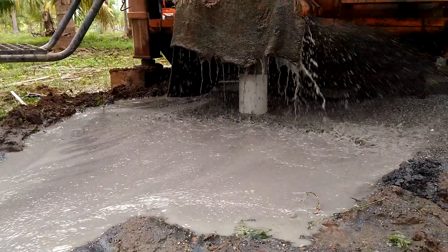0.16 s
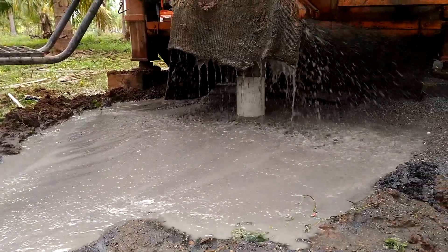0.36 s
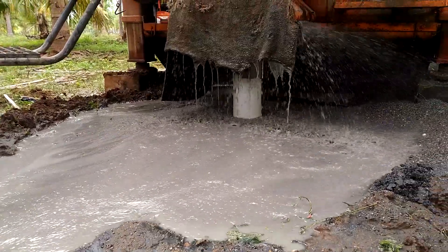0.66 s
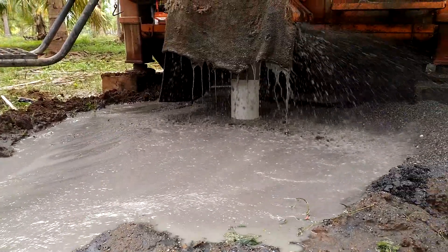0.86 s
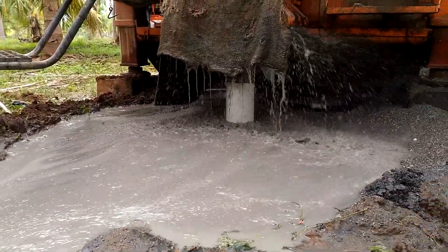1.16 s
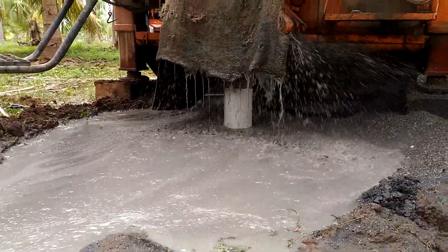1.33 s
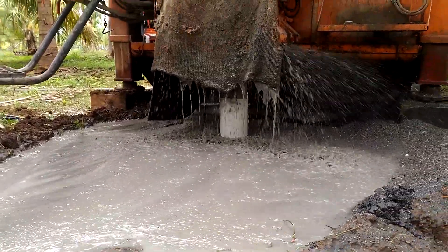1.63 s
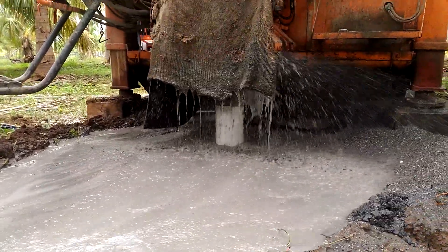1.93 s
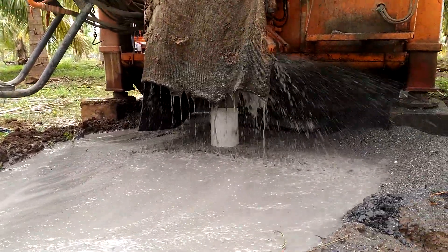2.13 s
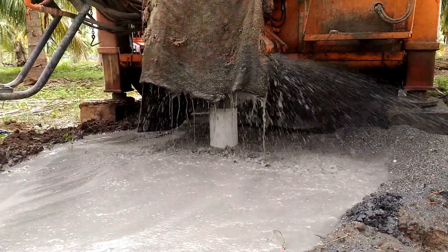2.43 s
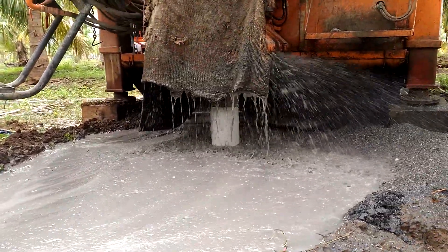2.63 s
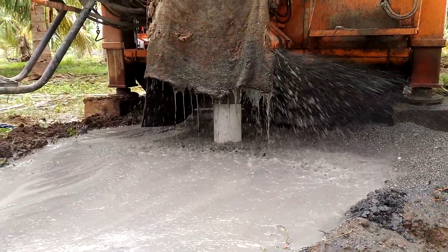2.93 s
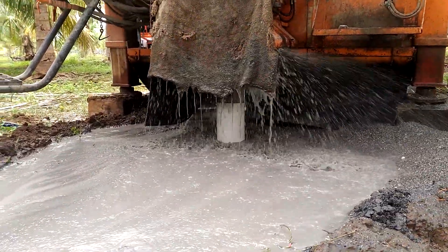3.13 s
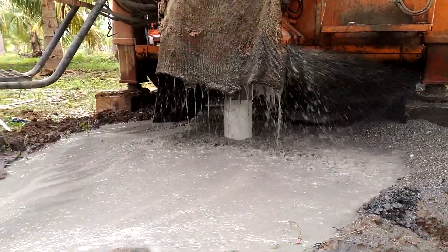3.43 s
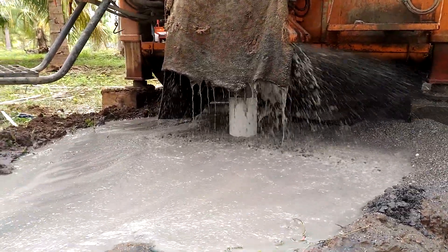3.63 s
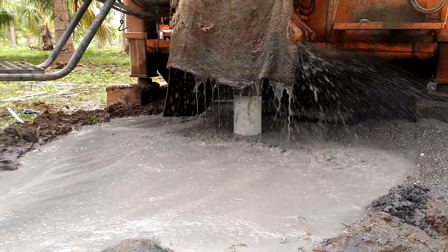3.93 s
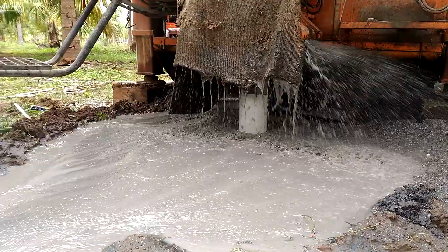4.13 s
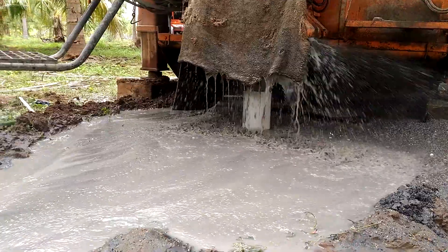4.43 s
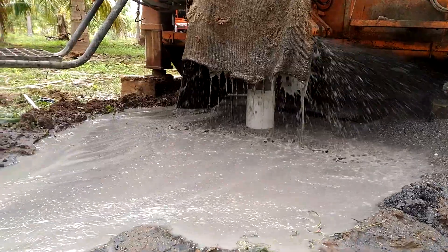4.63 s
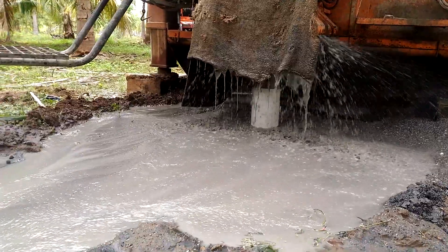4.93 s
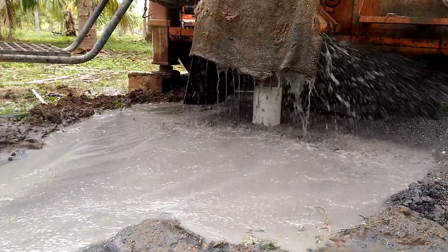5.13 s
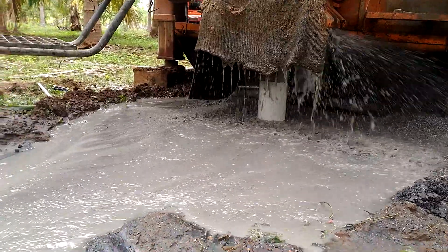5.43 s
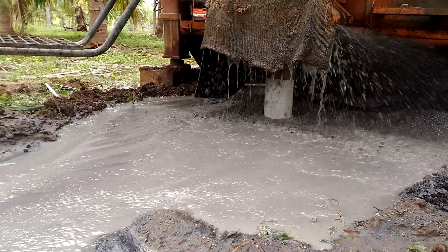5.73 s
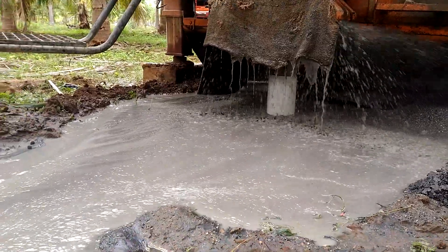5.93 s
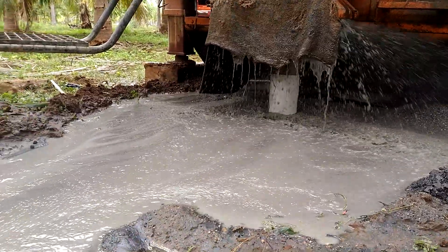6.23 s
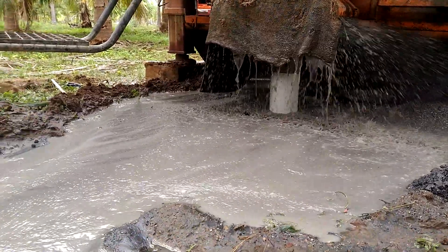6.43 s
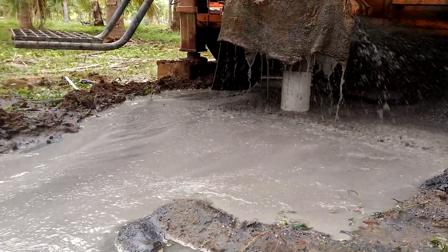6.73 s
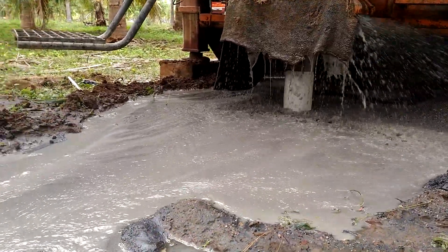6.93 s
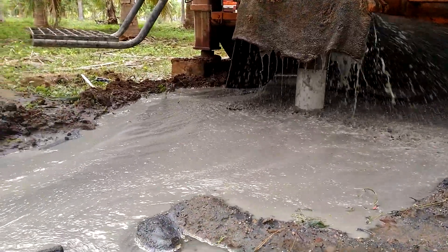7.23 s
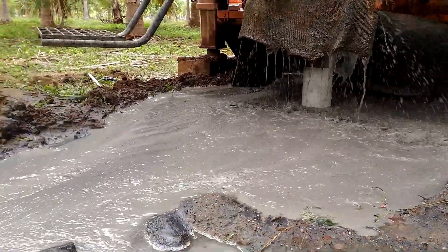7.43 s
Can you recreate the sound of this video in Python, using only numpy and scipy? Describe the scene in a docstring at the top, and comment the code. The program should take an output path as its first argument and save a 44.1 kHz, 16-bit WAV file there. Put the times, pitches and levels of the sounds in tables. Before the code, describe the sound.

A borewell drilling rig hammers at a rapid metallic rattle, steel rods scraping and squealing, over hissing water spray and a droning diesel engine outdoors.

```python
"""Outdoors at a borewell, beside a pool of slurry, a drilling rig works a few metres away.
An air hammer pounds deep in the hole: timed impulses climb the rods through narrow pass bands.
The turning rod scrapes the steel around it, heard as narrow modes driven by noise that throbs with the blows.
Air, water and grit spray from the well head as coloured noise that surges and puffs.
A six-cylinder diesel drones: sine orders of its firing rate over a broad noise roar."""
import sys
import numpy as np
from scipy import signal
from scipy.fft import rfft, irfft
from scipy.io import wavfile
from scipy.ndimage import uniform_filter1d

SR = 44100
rng = np.random.default_rng(int(sys.argv[2]) if len(sys.argv) > 2 else 0)


def to_wav(sig):
    """Store sig (one row per channel, or 1-D mono) as 16-bit WAV at the path in sys.argv[1].

    Samples outside -1..1 are clipped; the rate is SR.
    """
    pcm = np.clip(np.atleast_2d(sig), -1, 1) * 32767
    pcm = np.round(pcm).astype(np.int16)
    wavfile.write(sys.argv[1], SR, pcm.T)  # frames by channels


N = 333396
TIME = np.arange(N) / SR
HZ = np.fft.rfftfreq(N, 1 / SR)


def gain_of(db):
    """Logarithmic level: decibels to amplitude."""
    return 10 ** (np.asarray(db) / 20)


def evened(x):
    """Power normalisation: scales to rms 1."""
    return x / np.sqrt(np.mean(x ** 2) + 1e-20)


def curves(rows):
    """Linear interpolation: each column of a time table, sample by sample."""
    start_s, *columns = np.transpose(rows)
    return [np.interp(TIME, start_s, column) for column in columns]


def read(points, hz):
    """Logarithmic frequency axis: reads a table between its points."""
    point_hz, value = np.transpose(points)
    return np.interp(np.log(hz + 1), np.log(point_hz + 1), value)


def shaped(x, response):
    """Linear filtering: multiplies the spectrum by a frequency response."""
    return irfft(rfft(x) * response, N)


def wander(per_s):
    """Band-limited randomness: smooth chance of about rms 1, its peaks held below 2."""
    fine = signal.resample(rng.standard_normal(400), 400 * 20)
    drift = np.interp(TIME * per_s * 20, np.arange(len(fine)), fine)
    return 2 * np.tanh(drift * 0.55)


def pair(x, likeness):
    """Interaural correlation: two unrelated signals become a left and right of given likeness."""
    side = x[1] * np.sqrt((1 - likeness) / (1 + likeness))
    return np.array([x[0] + side, x[0] - side])


def placed(x, side_db):
    """Level-difference panning: leans a sound left (positive) or right (negative)."""
    return x * gain_of([[side_db / 2], [-side_db / 2]])


def steadied(x, size):
    """Automatic gain: holds the slow level of a stereo sound at 1, leaving its fast flutter."""
    power = uniform_filter1d((x ** 2).mean(0), size)
    power = uniform_filter1d(power, size // 2)
    x = x / np.sqrt(np.abs(power) + 1e-20)
    return x / x.mean(0).std()


def band(x, hz, width_hz, order):
    """Butterworth resonance: a pass band, steeper with each order."""
    edges = [hz - width_hz / 2, hz + width_hz / 2]
    return signal.sosfilt(signal.butter(order, edges, "bandpass", fs=SR, output="sos"), x)


# likeness of the left and right microphones: pitch_hz, likeness (0-1)
MICROPHONE_LIKENESS = [(60, 0.84), (600, 0.95), (1300, 0.57), (3000, 0.098), (5000, 0), (14000, 0)]


def coloured(x, spectrum):
    """Spatial coherence: gives two noises a spectrum and a likeness that depends on pitch."""
    likeness = read(MICROPHONE_LIKENESS, HZ)
    mid, side = rfft(x) * gain_of(read(spectrum, HZ)) * np.sqrt([1 + likeness, 1 - likeness])
    return irfft(np.array([mid + side, mid - side]), N) / irfft(mid, N).std()


# rate of the down-hole hammer: start_s, blows_per_s
HAMMER_RATE = [(0.0, 28.05), (0.7, 27.72), (1.1, 27.24), (1.6, 28.08), (2.0, 27.55), (2.35, 28.17),
               (2.9, 27.72), (3.3, 26.77), (3.55, 27.17), (3.85, 28.19), (4.25, 27.61), (4.6, 26.0),
               (4.95, 27.86), (5.3, 26.82), (5.7, 27.89), (6.3, 27.33), (6.8, 27.68), (7.56, 27.78)]


def hammer_turns():
    """Phase accumulation: the count of hammer cycles is the running integral of the blow rate."""
    return np.cumsum(curves(HAMMER_RATE)[0]) / SR


BLOW_SPREAD_DB, BLOW_JITTER_S = 2, .00008  # the piston keeps close time


def blows(turns, arrival_s, length_s):
    """Impulse excitation: one swell a blow, each of its own strength, and the sharp kick that starts it."""
    at = np.flatnonzero(np.diff(np.floor(turns), prepend=-1))
    size_db, late_s = (rng.standard_normal((len(at), 2)) * [BLOW_SPREAD_DB, BLOW_JITTER_S]).T
    landing = at + ((arrival_s + late_s) * SR).astype(int)
    kicks = np.zeros(N)
    kicks[np.clip(landing, 0, N - 1)] = gain_of(size_db)
    # a double pole makes each swell rise and die smoothly
    decay = np.exp(-1 / (length_s * SR))
    swell = signal.lfilter([1], [1, -2 * decay, decay * decay], kicks)
    return evened(swell), kicks


def rod_band(turns, hz, width_hz, db, arrival_s, length_s, regular, lingering):
    """Periodic waveguide: a blow climbs one pass band as a kick and a noise burst over lingering echoes."""
    swell, kicks = blows(turns, arrival_s, length_s)
    noise = pair(rng.standard_normal((2, N)), read(MICROPHONE_LIKENESS, hz))
    scatter = noise * evened(swell + lingering)
    kicks = np.roll(evened(kicks), round(length_s * SR))  # onto the peak of the swell
    drive = np.sqrt(regular) * kicks + np.sqrt(1 - regular) * scatter
    return gain_of(db) * steadied(band(drive, hz, width_hz, order=3), size=3300)


# pass bands of the rod string, one dull and several sharp:
# pitch_hz, width_hz, relative level_db, arrival_s after the blow, burst length_s
KNOCK_BAND = (472, 58, -.3, .008, .005)
CLANK_BANDS = [(660, 200, -9.5, .004, .002), (1040, 170, -5, .009, .002), (1422, 95, -1, .0085, .0018),
               (1525, 80, -7.5, .0095, .002), (1810, 80, -8, .014, .004), (2200, 70, -11, .016, .005)]
# their levels, about the usual level of each: start_s, level_db
KNOCK_LEVEL = [(0, -6), (0.1, 4.5), (0.26, -2.6), (0.9, 2.8), (1.05, 0.5), (1.9, -0.5), (2.55, -3.9),
               (3.2, 0.5), (3.42, -2), (3.87, 3.5), (4.73, -3.5), (4.82, 3), (5.0, -2.5), (5.33, 2),
               (5.6, -0.9), (7.08, 2), (7.25, -1.0), (7.56, -2)]
CLANK_LEVEL = [(0, 3.5), (0.55, -2.5), (0.92, 6), (1.03, -9), (1.15, 1.5), (2.3, -0.4), (3.38, -0.8),
               (3.58, 5.6), (3.8, -1.6), (4.2, 1.2), (4.8, -2.5), (5.3, 2.7), (5.55, -9), (6.02, 5.5),
               (6.35, -2), (6.7, 0.9), (7.15, 1.8), (7.56, -4)]
# shudder of the frame: multiple of the hammer rate, level_db
SHUDDER_ORDERS = [(2, -54), (3, -49), (4, -50), (5, -46), (7, -45), (9, -47), (10, -43), (11, -43),
                  (12, -50), (15, -48)]
KNOCK_DB, CLANK_DB = -24, -29.5
BITE_DB, BITE_PER_S = 1.4, 18  # the bit bites unevenly into the rock
KNOCK_REGULAR, CLANK_REGULAR = .5, .2  # power share of the kicks, against noise, in the drive


def hammer(turns):
    """Dispersive arrival: knock and clanks surface at different delays; the frame shudders in step."""
    knock_db = KNOCK_DB + curves(KNOCK_LEVEL)[0] + BITE_DB * wander(BITE_PER_S)
    clank_db = CLANK_DB + curves(CLANK_LEVEL)[0] + BITE_DB * wander(BITE_PER_S)
    knock = rod_band(turns, *KNOCK_BAND, regular=KNOCK_REGULAR, lingering=1.0)
    knock = placed(knock, side_db=0.8) * gain_of(knock_db)
    clank = sum(rod_band(turns, *row, regular=CLANK_REGULAR, lingering=0.82) for row in CLANK_BANDS)
    clank = placed(clank, side_db=-2.0) * gain_of(clank_db)
    shudder = 0
    for k in range(2, 16):
        # the frame smears each blow: its harmonics drift against one another
        phase = 2 * np.pi * (k * turns + rng.random()) + wander(1.97)
        shudder = shudder + gain_of(read(SHUDDER_ORDERS, k)) * np.cos(phase)
    return knock + clank + placed(np.sqrt(2) * shudder, 2.2)


def mode(force, hz, width_hz, side_db, phase, grip, size=16):
    """Modal resonance: a slow complex swing on one steel pitch; friction limits the swing."""
    t, rate = TIME[::size], SR / size
    jolts = force[::size] * (rng.standard_normal((2, len(t), 2)) @ [1, 1j])
    swing = signal.lfilter([1], [1, -np.exp(-np.pi * width_hz / rate)], jolts)
    swing = signal.lfilter(*signal.butter(1, 190, fs=rate), swing)
    swing = pair(swing, .7)  # reflections off the rig make the two sides differ
    height = uniform_filter1d(abs(swing).mean(0), size=60) + 1e-9
    swing = swing / height ** grip
    swing = swing / swing.std() * np.exp([[0], [-1j * phase]])
    carrier = np.exp(2j * np.pi * hz * TIME)
    tone = np.array([np.interp(TIME, t, side) for side in swing]) * carrier
    return placed(tone.real, side_db)


# narrow modes of the rods, the casing and the table, one list a family:
# pitch_hz, width_hz, relative level_db, left minus right side_db, phase_rad between the microphones
STEEL_FAMILIES = [
    [(2428, 26, -1.5, 1.5, -.3), (2470, 70, -7, 2, -.5)],
    [(3568, 44, 0, 4.5, -.6)],
    [(5422, 24, 0, 5.5, 2.1), (5175, 60, -20, 7, 1.6)],
    [(5614, 36, 0, 7.5, 1.6), (5734, 15, -2, 6, 1.7)],
    [(7954, 20, -3.5, -7, .8), (8009, 22, -3, -4, .6)],
    [(9108, 22, -6, -8, 1.6), (9367, 50, -5, -9, 1.9), (9620, 200, -8, -9, 1.9), (10334, 36, -6, -7, 2),
     (11250, 40, -23, -4, 2), (11840, 40, -17, -2, 1), (12784, 30, -16, -3, .8), (13680, 200, -21, -3, 1)],
]
# the rod catches and the family nearest in pitch squeals out:
# time_s of the height, length_s, pitch_hz, rise_db
SQUEAL_EVENTS = [(.18, .14, 3568, 4), (0.503, 0.094, 3568, 4), (0.69, .14, 7954, 6.5), (.81, 0.18, 5422, 4),
                 (1.006, 0.29, 7954, 6), (1.445, .14, 7954, 12), (1.769, 0.24, 2428, 7),
                 (2.157, 0.2, 3568, 9.5), (2.49, .18, 7954, 10), (2.499, 0.084, 5614, 6.5),
                 (3.04, 0.094, 5422, 6.5), (3.149, 0.086, 7954, 11), (3.94, 0.096, 5614, 7),
                 (4.003, 0.55, 3568, 6), (4.106, 0.098, 2428, 7), (4.238, 0.16, 3568, 9.5),
                 (4.264, 0.085, 5422, 3), (4.817, 0.32, 7954, 10), (4.89, 0.15, 3568, 8),
                 (5.29, 0.25, 5422, 7.5), (5.498, 0.26, 5614, 2.5), (5.54, 0.13, 5422, 10),
                 (5.902, .14, 7954, 7.5), (6.01, .12, 5422, 7.5), (6.45, 0.086, 7954, 9),
                 (6.571, 0.11, 5614, 7), (6.758, 0.097, 5422, 8.5), (7.172, 0.13, 5422, 6.5),
                 (7.38, 0.066, 5422, 10.5)]


def squeals():
    """Stick-slip friction: each family's extra level in dB, a smooth arch wherever the rod catches."""
    family_hz = np.array([modes[0][0] for modes in STEEL_FAMILIES])
    rise_db = np.zeros((len(STEEL_FAMILIES), N))
    for height_s, length_s, hz, db in SQUEAL_EVENTS:
        arch = np.maximum(1 - (2 * (TIME - height_s) / length_s) ** 2, 0)
        rise_db[np.argmin(abs(family_hz - hz))] += db * arch
    return rise_db


# how the rod presses on each family:
# follow (dB per dB of blow-out), sway_db, place in the sway (0-1), uneven_db
ROD_PRESSURE = [(0.55, 3, 0.02, 2.6), (-0.15, 2, 0.58, 2.97), (0.38, -0.1, 0.14, 2.5), (.5, 0.3, 0.5, 3.14),
                (1.5, 1.3, 0.6, 2.5), (1.44, 0, 0, 2.6)]
SWAYS_PER_S = 2.96  # the turning rod sways against the steel


def scrapes(flow_db):
    """Contact pressure: each family's level in dB follows blow-out, sway, chance and squeals."""
    pressed_db = []
    for follow, sway_db, place, uneven_db in ROD_PRESSURE:
        sway = np.cos(2 * np.pi * (SWAYS_PER_S * TIME - place))
        pressed_db.append(follow * flow_db + sway_db * sway + uneven_db * wander(20))
    return squeals() + pressed_db


# how each family is driven:
# level_db, throb (share that comes with the blows, 0-1), arrival_s after the blow, grip (0-1)
STEEL_CONTACT = [(-30.5, 0.47, 0.012, 0.02), (-32.5, 0.35, 0.011, 0), (-25.5, 0.6, 0.014, 0.52),
                 (-26, 0.54, 0.011, 0), (-30.5, 0.35, 0.019, 0), (-33, 0.42, .013, 0)]


def steel(turns, flow_db):
    """Modal superposition: blows jerk the rod against families of modes that vie in level."""
    out = np.zeros((2, N))
    for modes, scrape_db, contact in zip(STEEL_FAMILIES, scrapes(flow_db), STEEL_CONTACT):
        db, throb, arrival_s, grip = contact
        swell, _ = blows(turns, arrival_s, length_s=0.0058)
        force = 1 - throb + throb * swell
        ring = 0
        for hz, width_hz, mode_db, side_db, phase in modes:
            rivalry_db = 2.8 * wander(9)
            ring = ring + gain_of(mode_db + rivalry_db) * mode(force, hz, width_hz, side_db, phase, grip)
        out += steadied(ring, size=2600) * gain_of(scrape_db + db)
    return out


# strength of the blow-out from the well head, about its usual level: start_s, level_db
BLOW_OUT = [(0, 2.0), (1.1, 1.0), (1.66, -4), (1.74, 2.4), (2.5, 1.15), (3.2, 1.6), (3.6, -3), (4.37, 2.5),
            (4.62, -6.5), (4.8, 0), (5.28, -0.8), (5.41, -7.5), (5.64, -8), (5.82, 3.1), (6.28, -4),
            (6.7, 1.5), (7.0, -0.6), (7.56, 3.5)]
SURGE_DB, SURGES_PER_S = 1.2, 20  # slugs of water make the blow-out surge


def blow_out():
    """Two-phase flow: the blow-out level in dB, a slow course with random surges."""
    return curves(BLOW_OUT)[0] + SURGE_DB * wander(SURGES_PER_S)


# spectrum of the hiss: pitch_hz, relative level_db
SPRAY_SPECTRUM = [(500, -14.5), (1500, 3), (2100, 8), (2900, 3.5), (3400, 6), (3850, 3), (4150, -5.5),
                  (4800, -6), (5500, 1.5), (6400, 2), (7600, 1.5), (9800, -5), (11200, -9.5),
                  (12500, -15.5)]
# lean of the hiss: pitch_hz, left minus right side_db
SPRAY_LEAN = [(1500, -2.5), (2800, 2), (4500, 1.5), (6400, 8), (7500, -2), (8600, -7), (11000, -2)]
SPRAY_DB = -26.5  # before flow and gusts


def spray(turns, flow_db):
    """Turbulent jet noise: air and fine drops hiss out in gusts, puffing with the hammer."""
    swell, _ = blows(turns, arrival_s=0.012, length_s=0.0022)
    puffs = 1 + 0.13 * swell
    hiss = coloured(rng.standard_normal((2, N)) * puffs, SPRAY_SPECTRUM)
    side_db = read(SPRAY_LEAN, HZ)
    hiss = shaped(hiss, gain_of([side_db / 2, -side_db / 2]))
    gusts_db = .8 * wander(30)
    return hiss * gain_of(SPRAY_DB + .85 * flow_db + gusts_db)


# firing rate of the diesel: start_s, pitch_hz
FIRING_RATE = [(0, 75.25), (1, 74.54), (2, 73.48), (4.3, 74.4), (4.9, 73.4), (5.6, 73.74), (7.56, 74.84)]
# the third firing order swells and fades as the microphone moves through its standing wave:
# start_s, level_db before a 3 dB cut
THIRD_ORDER = [(0.0, -33), (0.81, -33.5), (1.32, -47), (1.47, -33.5), (2.42, -28), (3.02, -29.5),
               (3.53, -63), (3.86, -35), (4.34, -29.5), (4.88, -43), (5.09, -30.5), (5.3, -41),
               (5.78, -29.5), (6.23, -35), (6.41, -43), (6.73, -31.5), (7.56, -32)]
# steady engine lines: multiple of the firing rate, level_db, waver_db, left minus right side_db
ENGINE_ORDERS = [(1, -36.7, .5, 0), (2, -46, 1.2, 3), (4, -48, 1.5, 1), (4.5, -45, 1.2, 2)]
# spectrum of exhaust, fan and compressor: pitch_hz, relative level_db
ROAR_SPECTRUM = [(20, -39), (45, -53), (75, -2.5), (110, -4.5), (200, -4.5), (300, 4), (420, 1.5),
                 (600, 5.5), (820, 0.5), (1230, -2), (2000, -2), (2800, -12.5), (4200, -57), (8000, -50)]


def diesel():
    """Harmonic orders: sines locked to the firing rate waver in the open air over broadband roar."""
    turns = np.cumsum(curves(FIRING_RATE)[0]) / SR
    hum = np.sqrt(2) * np.sin(2 * np.pi * 3 * turns)
    drone = placed(hum, 5.7) * gain_of(curves(THIRD_ORDER)[0] - 3.0)
    for k, db, waver_db, side_db in ENGINE_ORDERS:
        line = gain_of(waver_db * wander(1.9)) * np.sin(2 * np.pi * (k * turns + rng.random()))
        drone = drone + placed(evened(line), side_db) * gain_of(db)
    roar_db = -26.5 + 2.0 * wander(27)
    roar = coloured(rng.standard_normal((2, N)), ROAR_SPECTRUM) * gain_of(roar_db)
    return drone + placed(roar, 1.0)


def scene():
    """Superposition: one hammer rhythm drives rods, steel and spray; the blow-out sways steel and spray."""
    turns = hammer_turns()
    flow_db = blow_out()
    return hammer(turns) + steel(turns, flow_db) + spray(turns, flow_db) + diesel()


EDGE_HZ = 14350  # upper limit of the recorder's band


def record(dry):
    """Soft saturation and band limiting: the recorder rounds off the peaks and cuts the top treble."""
    rounded = dry / (1 + (dry / .88) ** 8) ** (1 / 8)
    lowpass = signal.firwin(511, EDGE_HZ, window=("kaiser", 9), fs=SR)
    return signal.oaconvolve(rounded, lowpass[None], "same")


dry = scene()
out = record(dry)
to_wav(out)
```